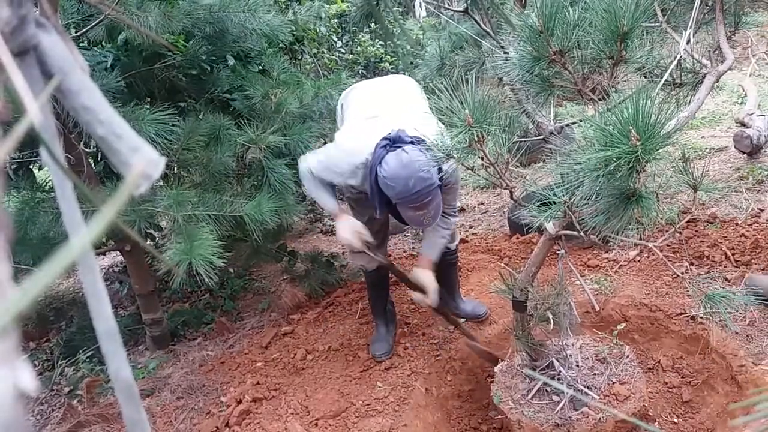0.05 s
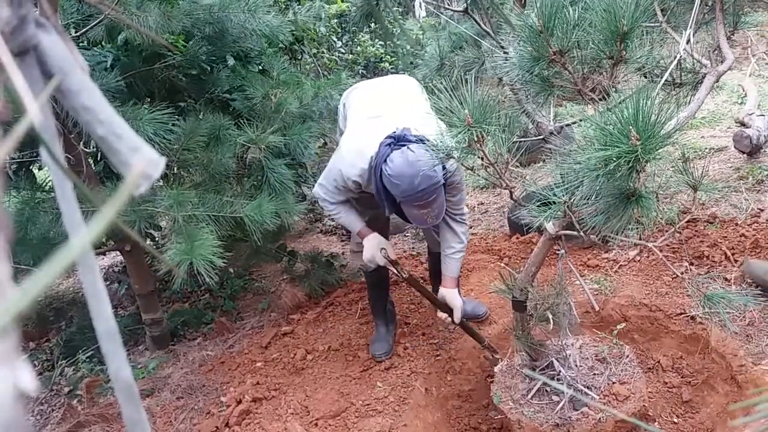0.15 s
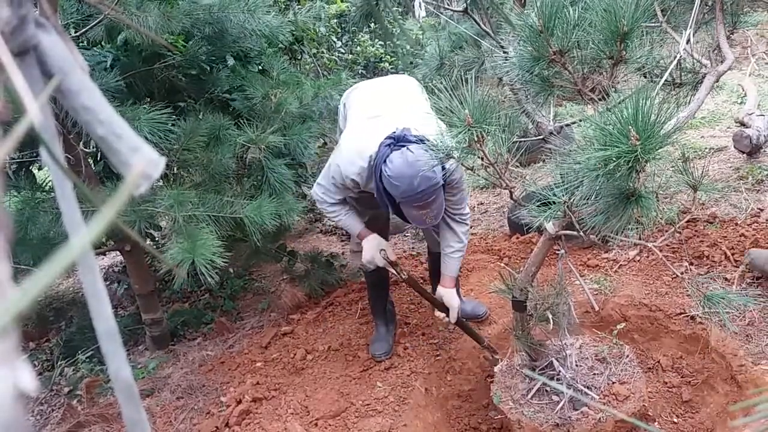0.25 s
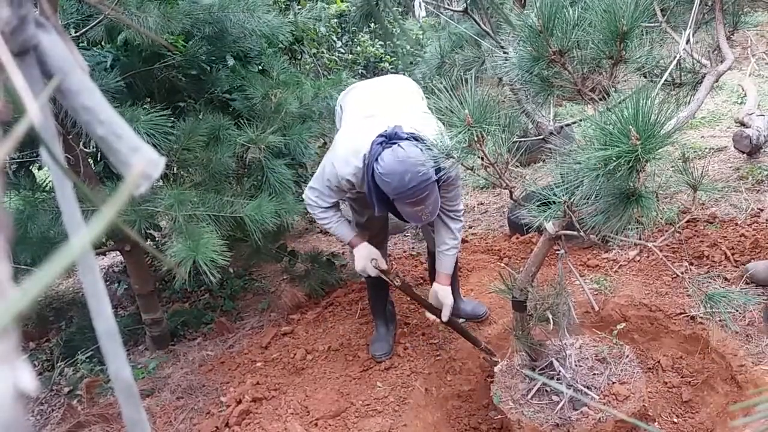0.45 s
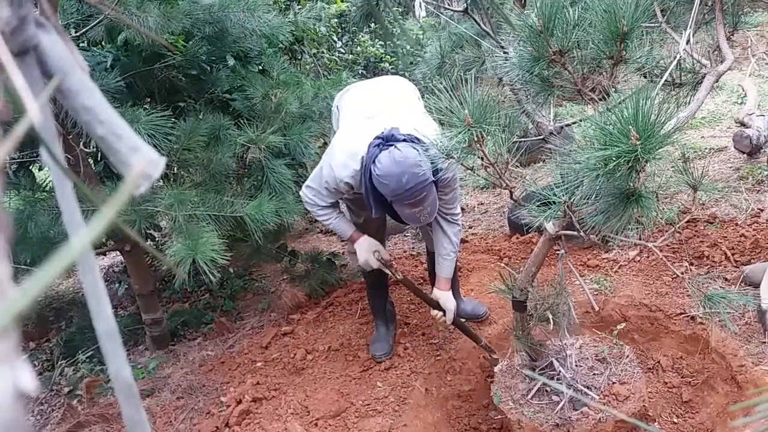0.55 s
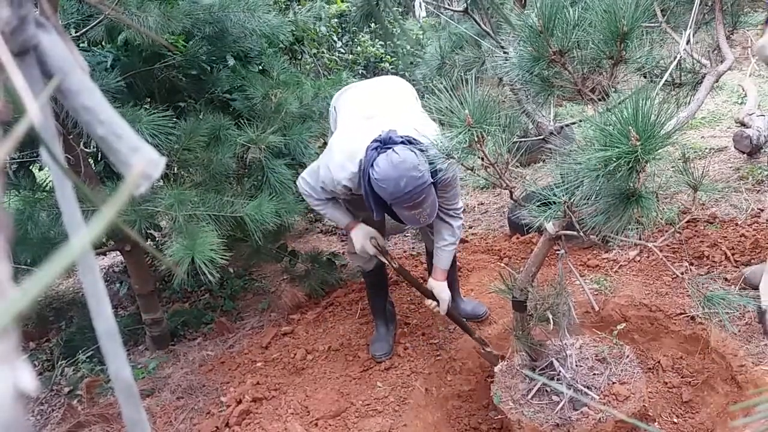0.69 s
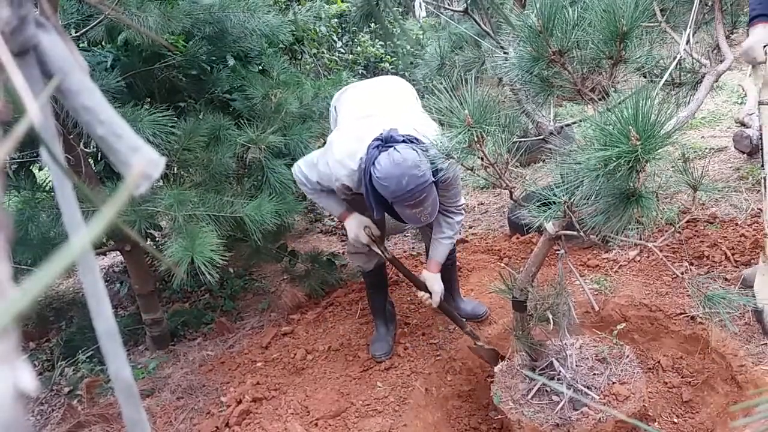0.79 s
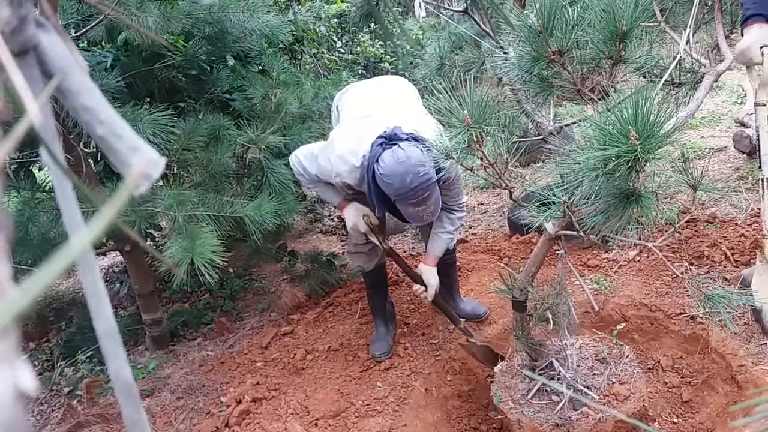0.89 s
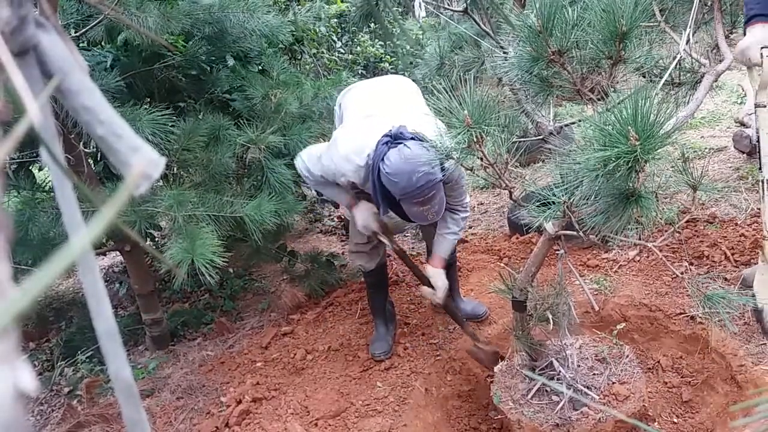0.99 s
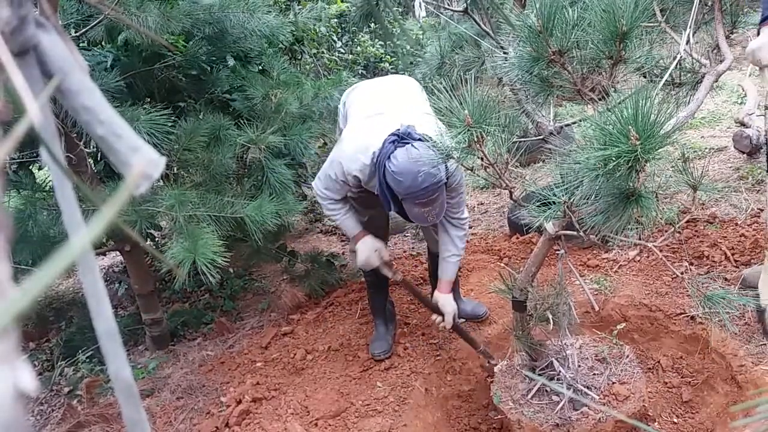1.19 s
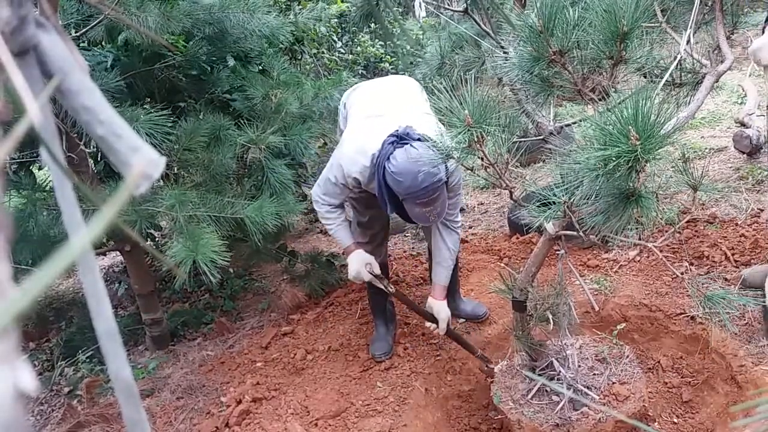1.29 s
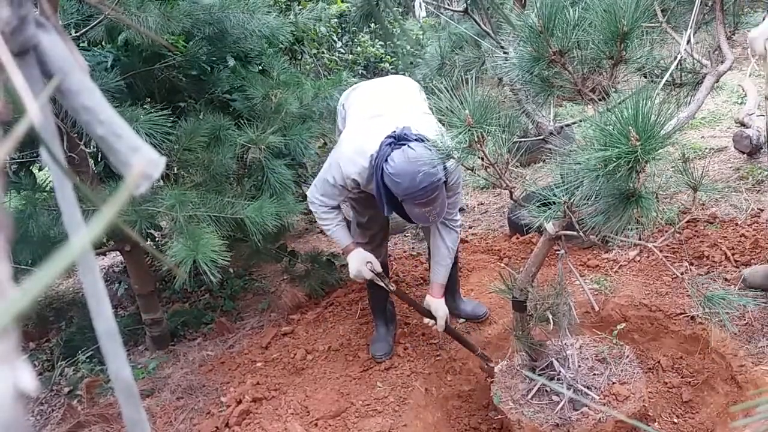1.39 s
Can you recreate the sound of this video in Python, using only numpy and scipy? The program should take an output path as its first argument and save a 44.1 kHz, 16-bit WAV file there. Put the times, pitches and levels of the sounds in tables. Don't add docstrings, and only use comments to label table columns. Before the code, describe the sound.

A steel spade chops twice into hard clay, first with a bright ring, then a dull knock

```python
import sys
import numpy as np
from scipy import signal
from scipy.io import wavfile
from scipy.ndimage import uniform_filter1d

SR = 44100
rng = np.random.default_rng(int(sys.argv[2]) if len(sys.argv) > 2 else 0)


def dump_mix(stems):
    frames = np.atleast_2d(stems).T
    limited = np.clip(frames, -1, 1)
    pcm = np.round(limited * 32767).astype(np.int16)
    wavfile.write(sys.argv[1], SR, pcm)


def field_ratio(decibels):
    return 10 ** (np.asarray(decibels, dtype=float) / 20)


N = 63945


def evened(x):
    return x / np.sqrt(np.mean(x ** 2) + 1e-20)


def read(points, hz):
    f, value = np.transpose(points)
    return np.interp(np.log(hz + 1), np.log(f + 1), value)


def add(mix, s, sound):
    part = mix[max(round(s * SR), 0):][:len(sound)]
    part += sound[:len(part)]


def shaped(x, gain):
    hz, t, z = signal.stft(x, SR, nperseg=256, noverlap=192)
    return signal.istft(z * gain(hz[:, None], t), SR, nperseg=256, noverlap=192)[1][:len(x)]


# [f/Hz, density/dB per Hz]
AIR_SPECTRUM = [(40, 1.5), (90, -3.5), (300, -6), (650, -13.5), (3200, -25), (5500, -35), (9000, -35),
                (16000, -37.5)]


def air():
    frames = N // 256 + 5
    hz = np.fft.rfftfreq(1024, 1 / SR)
    real, imag, patches = rng.standard_normal((frames, 513, 3)).T
    patches = uniform_filter1d(patches, 12, 0)
    patches = evened(uniform_filter1d(patches, 10, 1))
    level_db = read(AIR_SPECTRUM, hz)[:, None] + 1.2 * patches
    z = (real + 1j * imag) * field_ratio(level_db)
    noise = signal.istft(z, nperseg=1024, noverlap=768)[1][:N]
    return field_ratio(-52.5) * evened(noise)


def grit(size, lumpy_db, clump_db=0.7):
    clicks = rng.standard_normal(size)
    drift = rng.standard_normal(size)
    sizes = np.minimum(rng.exponential(1, size), 5)
    for _ in range(2):
        drift = uniform_filter1d(drift, size=130)
    return evened(clicks * field_ratio(lumpy_db * sizes + clump_db * evened(drift)))


def crumb(length_s, level_db, centre_hz, octaves):
    t = np.arange(SR // 3) / SR

    def colour(hz, u):
        band = np.exp(-0.5 * (np.log2((hz + 1) / centre_hz) / octaves) ** 2)
        fizz = field_ratio(-20) / (1 + (hz / 11040) ** 2)
        return band + fizz

    shape = np.minimum(t / 0.0018, 1) * np.exp(-(t / length_s) ** 2)
    return field_ratio(level_db) * shape * evened(shaped(grit(len(t), lumpy_db=2.0), colour))


# [t/s, length/s, level/dB, centre f/Hz, width/octaves]
CRUMB_AND_ECHO_EVENTS = [(0.0, 0.12, -61, 3740, 0.83), (.139, .015, -62.5, 4350, 0.71), (.1, .12, -68, 4500, .6),
                         (0.364, 0.069, -52.5, 1210, 1), (0.391, 0.023, -51.5, 2670, 0.24),
                         (0.473, 0.024, -60, 2700, 0.45), (.577, 0.013, -57.5, 2370, 0.77),
                         (.59, .035, -54, 2700, .65), (.45, .12, -66, 4000, .6), (0.7, 0.056, -65.5, 2480, 0.75),
                         (0.844, 0.015, -64, 3200, 0.3), (0.902, 0.012, -66, 2610, .4), (1.106, 0.073, -70, 492, 1),
                         (1.182, .045, -53, 2400, .4), (1.224, 0.036, -57.5, 2200, 0.44)]


def crumbs_and_echoes():
    out = np.zeros(N)
    for s, *slide in CRUMB_AND_ECHO_EVENTS:
        add(out, s, crumb(*slide))
    return out


def ring(modes, contact_s):
    t = np.arange(12000) / SR
    tones = sum(field_ratio(db - 60 * t / t60) * np.sin(2 * np.pi * hz * t) for hz, db, t60 in modes)
    push = t[:200] / contact_s * np.exp(-t[:200] / contact_s)
    struck = np.convolve(tones, push)[:len(t)]
    out = signal.lfilter(*signal.butter(2, 200, "high", fs=SR), struck)
    return out / abs(out).max()


def tuned(pitches, rows):
    return [(hz, *row) for hz, row in zip(pitches, rows)]


SHAFT_PITCHES = [190, 343, 559, 715, 1213, 1318, 1657]
# [level/dB, t60/s]
SHAFT_DECAYS = [(-19, 0.2), (-13, 0.23), (4, 0.065), (5, 0.12), (3.5, 0.11), (2, 0.087), (-23, 0.02)]


def shaft_ring(contact_s):
    return ring(tuned(SHAFT_PITCHES, SHAFT_DECAYS), contact_s)


BLADE_PITCHES = [1970, 2285, 2620, 2685, 3165, 3428, 3731, 4200, 4424, 4695, 4880, 5260, 6950, 9100]
# [level/dB, t60/s]
BLADE_DECAYS = [(-12, 0.059), (-4.5, 0.082), (2.5, 0.033), (-3.5, .07), (0, .04), (-3, 0.096), (2, 0.053),
                (-7.5, 0.096), (0, 0.1), (3.5, .05), (-20, 0.0552), (-6, .06), (2.5, .025), (-4.5, .025)]


def blade_ring(contact_s):
    return ring(tuned(BLADE_PITCHES, BLADE_DECAYS), contact_s)


# [f/Hz, level/dB, t60/s]
BURIED_MODES = [(361, -4.5, 0.034), (463, -5, .025), (730, 3.5, 0.011), (1454, 4.5, 0.013),
                (1690, -11, 0.057), (2227, -5, 0.025), (2700, -18.5, 0.13), (3260, -13.5, 0.045),
                (4600, -16, 0.033), (5450, -13, 0.019), (7300, -15, .022), (9500, -20, .012),
                (11800, -19, .015), (14500, -20, .012)]


def buried_ring(contact_s):
    return ring(BURIED_MODES, contact_s)


# [f/Hz, t60/s]
TAIL_DECAY = [(150, 0.56), (500, .2), (1500, 0.25), (4000, .26), (8000, 0.29), (15000, 0.2)]


def crack_and_tail(rise_s, crack_db, crack_t60_s, tail_db, colour, t60_share, steel):
    t = np.arange(SR // 2) / SR
    raw = grit(len(t), lumpy_db=3.2)
    plain = evened(shaped(raw, lambda hz, u: field_ratio(read(colour, hz))))
    bright = shaped(plain, lambda hz, u: hz ** 2 / (hz ** 2 + 1800 ** 2))
    rattle = evened(signal.fftconvolve(raw, steel)[:len(t)])

    def decay(hz, u):
        return field_ratio(-60 * u / (t60_share * read(TAIL_DECAY, hz)))

    tail = field_ratio(tail_db) * shaped(plain + field_ratio(-4) * rattle, decay)
    crack = field_ratio(crack_db - 60 * t / crack_t60_s) * bright
    return np.minimum(t / rise_s, 1) ** 3 * (tail + crack)


# [t/s, rise/s, crack level/dB, crack t60/s, tail level/dB]
CRACK_EVENTS = [
    (.2255, 0.0046, -14.5, 0.039, -22.5),
    (1.1665, 0.0055, -20.5, 0.036, -34),
]
# [f/Hz, density/dB per Hz]
BRIGHT_COLOUR = [(100, -26), (200, -13.5), (700, -12.5), (1100, -17), (4500, -6), (5350, -9), (5700, -16.5),
                 (16000, -37)]
# [f/Hz, density/dB per Hz]
DULL_COLOUR = [(100, -5), (400, 0.5), (1100, -9.5), (1700, -7.5), (2750, -14), (3600, -16.5), (8000, -26.5),
               (16000, -44.5)]


def cracks_and_tails():
    out = np.zeros(N)
    contact_s = 0.00003
    (first_s, *first), (second_s, *second) = CRACK_EVENTS
    add(out, first_s, crack_and_tail(*first, BRIGHT_COLOUR, 0.95, blade_ring(contact_s)))
    add(out, second_s, crack_and_tail(*second, DULL_COLOUR, 0.63, buried_ring(contact_s)))
    return out


# [t/s, level/dB, f/Hz, t60/s]
LATE_TONE_EVENTS = [
    (.268, -28.5, 727, .06),
    (.349, -54, 530, 0.069),
    (.368, -44.5, 728, 0.23),
    (.368, -52.5, 1451, 0.25),
    (1.11, -51.5, 717, 0.17),
    (1.222, -51, 1690, 0.087),
    (1.237, -50, 1710, 0.054),
]


def late_tones():
    out = np.zeros(N)
    t = np.arange(12000) / SR
    rise = np.minimum(t / 0.003, 1)
    for s, db, hz, t60 in LATE_TONE_EVENTS:
        add(out, s, rise * field_ratio(db - 60 * t / t60) * np.sin(2 * np.pi * hz * t))
    return out


# [t/s, level/dB]
KNOCK_HITS = [
    (1.1697, -33),
    (1.1706, -7.5),
    (1.1749, -22.5),
    (1.1790, -25),
]


def dull_chop():
    out = np.zeros(N)
    buried = buried_ring(contact_s=0.00005)
    for s, db in KNOCK_HITS:
        add(out, s, field_ratio(db) * buried)
    return out


def gripped(x, start_s, grip_db):
    t = np.arange(len(x)) / SR
    return x * field_ratio(grip_db * np.clip((t - start_s) / 0.003, 0, 1))


# [t/s, shaft level/dB, blade level/dB]
CHOP_HITS = [
    (0.2275, -23.5, -26.5),
    (0.2298, -5, -13),
    (0.2345, -30.5, -2),
    (.2373, -36, -12),
    (.2510, -46.5, -17),
]


def ringing_chop():
    out = np.zeros(N)
    shaft = gripped(shaft_ring(contact_s=0.00011), start_s=0.0154, grip_db=-14.5)
    blade = gripped(blade_ring(contact_s=0.00003), start_s=0.0044, grip_db=-3)
    for s, shaft_db, blade_db in CHOP_HITS:
        add(out, s, field_ratio(shaft_db) * shaft - field_ratio(blade_db) * blade)
    return out


def scene():
    out = air() + crumbs_and_echoes() + cracks_and_tails() + late_tones() + dull_chop() + ringing_chop()
    return out[None]


def low_pass(x):
    return signal.sosfilt(signal.butter(12, 16460, fs=SR, output="sos"), x)


def record(dry):
    bass_cut = signal.butter(4, 63, "high", fs=SR, output="sos")
    band_limit = signal.firwin(numtaps=81, cutoff=15900, fs=SR)
    mix = signal.sosfilt(bass_cut, dry)
    mix = signal.oaconvolve(mix, band_limit[None], "same")
    return low_pass(mix)


dry = scene()
out = record(dry)
dump_mix(out)
```